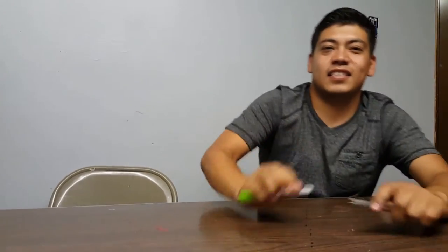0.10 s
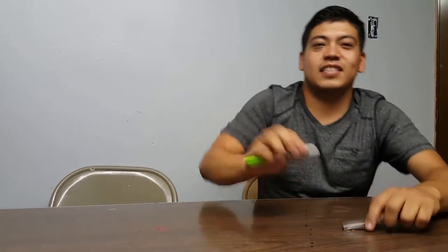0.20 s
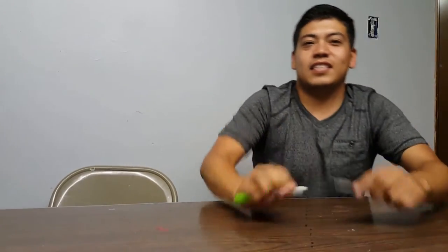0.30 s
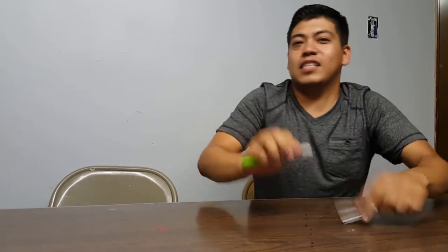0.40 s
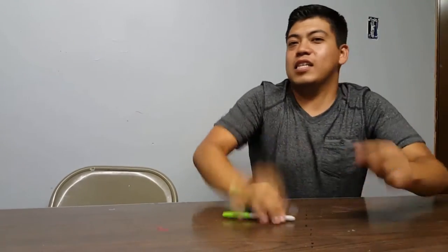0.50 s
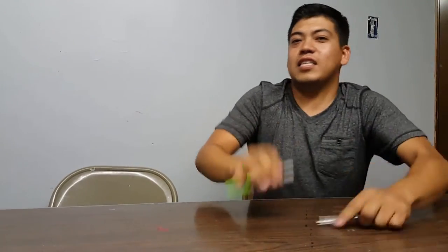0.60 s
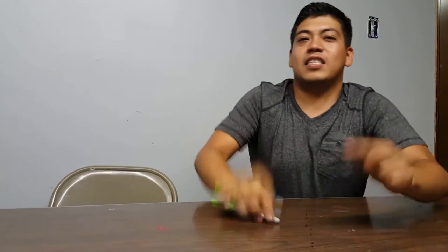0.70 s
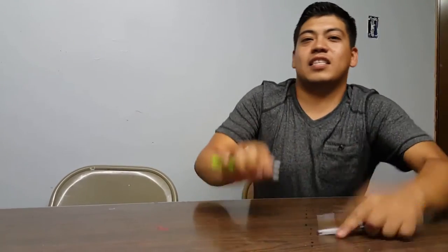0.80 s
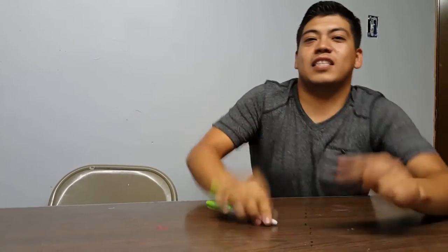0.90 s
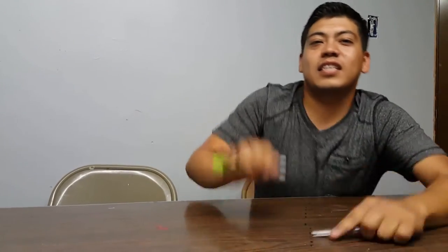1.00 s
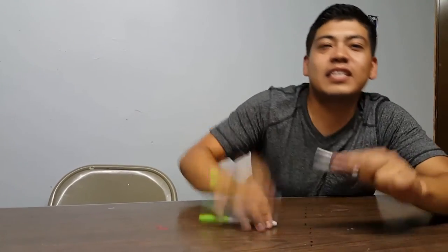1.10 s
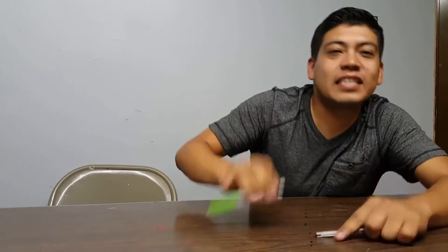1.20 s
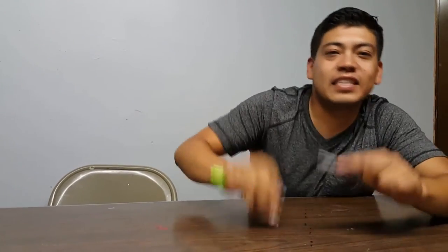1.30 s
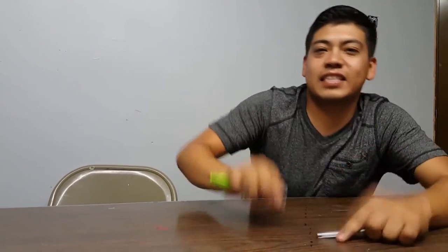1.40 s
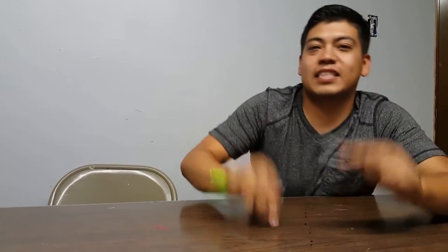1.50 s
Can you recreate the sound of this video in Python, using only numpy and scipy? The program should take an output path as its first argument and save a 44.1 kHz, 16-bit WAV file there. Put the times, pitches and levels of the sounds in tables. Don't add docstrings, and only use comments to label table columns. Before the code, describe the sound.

Plastic pens and hand heels drum a wooden table in quick uneven strokes, bright ticks over low thuds; a loud flat slap lands midway, then lighter taps follow. Small bare echoing room, close stereo microphone.

```python
import sys
import numpy as np
from scipy import signal
from scipy.io import wavfile

SR = 44100
rng = np.random.default_rng(int(sys.argv[2]) if len(sys.argv) > 2 else 0)


def gain_from_decibels(decibels):
    exponent = np.asarray(decibels, float) / 20
    return 10 ** exponent


def dump(signal):
    limited = np.clip(np.atleast_2d(signal).T, -1, 1)
    pcm = np.round(limited * 32767).astype(np.int16)
    wavfile.write(sys.argv[1], SR, pcm)


N = 68355


def read(points, hz):
    table_hz, value = np.transpose(points)
    return np.interp(np.log(hz + 1), np.log(table_hz + 1), value)


def add(mix, start_s, sound, pan_db):
    lag_s_per_db, widest_db = .000012, 5.0
    pan_db = np.clip(pan_db, -widest_db, widest_db)
    for channel, side in zip(mix, (.5, -.5)):
        start = max(round((start_s - side * pan_db * lag_s_per_db) * SR), 0)
        part = channel[start:][:len(sound)]
        part += sound[:len(part)] * gain_from_decibels(side * pan_db)


def ring(hz, db, t60, length_s):
    t = np.arange(0, length_s, 1 / SR)[:, None]
    fading = gain_from_decibels(db - 60 * t / np.maximum(t60, .002))
    return (fading * np.sin(2 * np.pi * hz * t)).sum(1)


# frequency in Hz, likeness from 0 to 1.
LIKENESS = [(100, .995), (250, .96), (500, .6), (1500, .25), (10000, .02)]


def stereo_noise(gain_db):
    frames, hz = N // 128 + 5, np.fft.rfftfreq(512, 1 / SR)[:, None]
    a, b, c, d = rng.standard_normal((frames, 257, 4)).T
    likeness = np.clip(read(LIKENESS, hz), 0, 1)
    shared = np.sqrt(1 + likeness) * (a + 1j * b)
    different = np.sqrt(1 - likeness) * (c + 1j * d)
    spectra = np.array([shared + different, shared - different])
    spectra = spectra * gain_from_decibels(gain_db(hz, np.arange(frames) * 128 / SR))
    return signal.istft(spectra, nperseg=512, noverlap=384)[1][:, :N]


# start in seconds, level in dB, left-right in dB,
# brightness in dB per octave.
TICKS = [(0.046, -20.5, 9, -2), (0.2423, -30.5, 1, -0.5), (0.3082, -56, -1.5, 0.4), (0.3898, -34.5, -3, -3),
         (0.4454, -34, -11, -5), (0.447, -35, -2.5, 6), (0.4997, -25.5, 11, 4.5), (0.6006, -22, 1.5, 3),
         (0.6837, -16.5, 12, -1), (0.6898, -14.5, -7, 0), (0.7653, -25, -8, 3), (0.8935, -33.5, 12, -3.5),
         (0.9871, -28, -12, 9.5), (1.0867, -37, 3, -0.8), (1.1701, -31, 2, 6), (1.293, -19, 2.5, 0),
         (1.3008, -20.5, 7.0, 4.5), (1.3752, -26, -11, 1.1), (1.4525, -48, 13, 1), (1.5129, -36.5, -2, -5)]
# frequency in Hz, level in dB, seconds to die by 60 dB.
TIP_TONES = [(2800, -8, .004), (3600, -1, .004), (4500, -6, .003), (6200, -4, .003), (8400, -1, .003),
             (10500, -7, .003), (12500, -4, .003), (14000, -5, .002)]


def ticks():
    level_trim_db, chatter_s, spread_db = 0.1, .001, 1.5
    lag_s, to_room_db = .0007, -8.0
    near, far = np.zeros((2, N)), np.zeros((2, N))
    hz, db, t60 = np.transpose(TIP_TONES)
    luck = rng.standard_normal((len(TICKS), 2, len(TIP_TONES)))
    grit = rng.standard_normal((len(TICKS), 200))
    for (start_s, level_db, pan_db, tilt_db), (detune, uneven), grains in zip(TICKS, luck, grit):
        chatter = grains ** 3 * np.exp(-np.arange(200) / (chatter_s * SR / 2))
        chatter[0] = -2 * abs(chatter).max()
        tilted_db = db + np.clip(tilt_db, -4, 4) * np.log2(hz / 6000)
        tones = ring(hz * (1 + detune / 30), tilted_db + spread_db * uneven, t60, .02)
        sound = np.convolve(chatter, tones)
        sound = gain_from_decibels(level_db + level_trim_db) * sound / abs(sound).max()
        click = ring(hz, tilted_db, t60 / 3, .01)
        click = gain_from_decibels(to_room_db) * click * np.linalg.norm(sound) / np.linalg.norm(click)
        add(near, start_s + lag_s, sound, pan_db)
        add(far, start_s + lag_s, click, 0)
    return near, far


BARREL_TO_ROOM_DB = -8.5
# start in seconds, level in dB, left-right in dB,
# pitch ratio set by the free length.
KNOCKS = [(0.049, -45, 7, 1.01), (0.245, -69, -5, 1.8), (0.448, -59, 7, 1.65), (0.69, -19.5, 9, 1.256),
          (.770, -29.5, 6, 0.923), (.896, -38, 4, 0.497), (0.9913, -36, 5, 0.998), (1.088, -37.5, 7, 0.43),
          (1.1742, -35.5, -3, .99), (1.300, -26, 8.5, 0.97), (1.380, -37.5, -13, 1),
          (1.514, -41.5, 56, 0.81)]
# frequency in Hz, level in dB, seconds to die by 60 dB.
BARREL_TONES = [(550, -21, 0.01), (765, -2, 0.028), (1028, 11.5, 0.0098), (1249, 12, 0.012),
                (1550, -6.5, 0.013), (1860, -29, 0.0035), (2586, 0, 0.015), (2940, -17, .01)]


def knocks():
    level_trim_db, rise_s = -2, .0012
    out = np.zeros((2, N))
    hz, db, t60 = np.transpose(BARREL_TONES)
    for start_s, level_db, pan_db, pitch_ratio in KNOCKS:
        sound = ring(hz * pitch_ratio, db, t60, .06)
        sound = sound * np.minimum(np.arange(len(sound)) / SR / rise_s, 1)
        add(out, start_s, gain_from_decibels(level_db + level_trim_db) * sound / abs(sound).max(), pan_db)
    return out, gain_from_decibels(BARREL_TO_ROOM_DB) * out


# start in seconds, level in dB, contact time in seconds,
# place along the top from 0 to 1.
THUDS = [(.008, -41, 0.0019, 0.59), (0.047, -25.5, .0015, 0.75), (0.244, -19, 0.00255, 0.24),
         (0.311, -29.5, 0.0015, 0.45), (.448, -18, 0.0026, .05), (0.5, -31.5, 0.0025, 0),
         (0.599, -39, 0.00067, 0), (0.689, -28.5, 0.0016, 0.9), (0.768, -67, 0.001, 0.66),
         (.895, -44.5, 0.0017, .3), (.992, -39.5, 0.0033, 0.7), (1.088, -42, 0.0019, 0.58),
         (1.173, -38, 0.0011, 0.75), (1.295, -48, 0.0033, 0.8), (1.301, -33.5, 0.0016, 0.73),
         (1.376, -27.5, 0.0037, 0.72), (1.512, -40.5, 0.00058, 0.88)]
# frequency in Hz, level in dB, seconds to die by 60 dB,
# half waves along the top.
TOP_TONES = [(55.6, -41, 0.042, 0.69), (81.5, -40, 0.16, .4), (122, -17, 0.27, 0.82), (143.56, 5, 0.47, .7),
             (178.06, -13.5, 0.48, 0.27), (200.4, 3.5, 0.37, 0.58), (226.6, -9, .3, 0.25),
             (244.1, -2, 0.26, 0.3), (274.7, -5.5, 0.225, 0.034), (329, -24, 0.59, 1),
             (339, -11.5, 0.5, 0.94), (407, -22, 0.6, 0.91), (466, -19.5, 0.2, 0.38), (542, -17, 0.6, 0.71)]


def thuds():
    swell_s, swell_start = .012, .5
    out = np.zeros((2, N))
    hz, db, t60, half_waves = np.transpose(TOP_TONES)
    for start_s, level_db, contact_s, place in THUDS:
        push = np.sin(np.pi * np.clip(np.arange(400) / SR / max(contact_s, 1e-4), 0, 1))
        movement = abs(np.cos(np.pi * half_waves * place)) + 0.059
        tones = ring(hz, db + 20 * np.log10(movement), t60, .7)
        tones = tones * (1 - (1 - swell_start) * np.exp(-np.arange(len(tones)) / SR / swell_s))
        add(out, start_s, -gain_from_decibels(level_db) * np.convolve(push / push.sum(), tones), 0.3)
    return out


# start in seconds, level in dB,
# width in seconds (below zero is a pull), left-right in dB.
SLAPS = [
    (0.6907, -8, .0012, 1.3),
    (0.6915, -14.5, -0.0056, 2.9),
    (1.3000, -26, -0.00035, 14),
]


def slaps():
    out = np.zeros((2, N))
    for start_s, level_db, width_s, pan_db in SLAPS:
        u = np.arange(1200) / SR / abs(width_s)
        puff = np.sign(width_s) * gain_from_decibels(level_db) * (1 - u) * np.exp(-u)
        add(out, start_s, puff * np.minimum(u * 10, 1), pan_db)
    return out


# frequency in Hz, level in dB.
FRAME_LEVEL = [(300, -11.5), (500, -23.5), (1000, -34.5), (2500, -45), (5000, -51), (9000, -52.5),
               (15000, -74)]
# frequency in Hz, seconds to die by 60 dB.
FRAME_T60 = [(400, .6), (1200, .95), (3000, .9), (6000, .7), (12000, .55)]


def frame_ring():
    level_trim_db, db_per_db, earlier_db = -13.0, 2.2, -25.5
    out, rise = np.zeros((2, 2 * N)), np.minimum(np.arange(N) / SR / 0.0039, 1)

    def fading_db(hz, t):
        return read(FRAME_LEVEL, hz) - 60 * t / read(FRAME_T60, hz)

    tails = [rise * stereo_noise(fading_db) for _ in range(3)]
    for k, (start_s, level_db, _, _) in enumerate(THUDS):
        gain = gain_from_decibels(level_trim_db + db_per_db * (level_db + 16))
        out[:, round(start_s * SR):][:, :N] += gain * tails[k % 3]
    earlier = np.pad(tails[2][:, 400:], [(0, 0), (0, 400)])
    return out[:, :N] + gain_from_decibels(level_trim_db + earlier_db) * earlier


# delay in seconds, level in dB.
EARLY = [(.003, -23.5), (.0055, -41), (.009, -3), (.012, -53), (.023, -10), (.03, -16.5)]
# frequency in Hz, seconds to die by 60 dB.
ROOM_T60 = [(100, 0.45), (260, 0.69), (700, 0.24), (1840, .25), (4850, 0.29), (12800, 0.13)]
# frequency in Hz, level in dB.
ROOM_LEVEL = [(100, -3.5), (400, 7), (1500, 6.5), (5000, 7), (14000, 10.5)]


def room(direct, send, wall_db):
    wall_s = .0172
    tail = stereo_noise(lambda hz, t: read(ROOM_LEVEL, hz) - 60 * t / read(ROOM_T60, hz))
    plain = stereo_noise(lambda hz, t: -60 * t / read(ROOM_T60, hz))
    tail = tail / np.linalg.norm(plain[0]) * np.minimum(np.arange(N) / SR / 0.0065, 1)
    for k, (delay_s, db) in enumerate(EARLY):
        tail[k % 2, round(delay_s * SR)] += gain_from_decibels(db) * (-1) ** (k // 2)
    tail[:, round(wall_s * SR)] += gain_from_decibels(wall_db)
    return direct + signal.fftconvolve(send.mean(0)[None], tail, axes=1)[:, :N]


# frequency in Hz, level in dB per Hz.
HUSH = [(18, -48), (30, -18), (252, 0), (584, -18), (937, -13), (1670, -25), (1960, -21), (3870, -35),
        (16000, -43)]


def hush():
    noise = stereo_noise(lambda hz, t: read(HUSH, hz) + 0 * t)
    return gain_from_decibels(-62.0) * noise / noise.std()


def scene():
    wall_db, wall_bass_db, top_to_room_db = -5.5, 6.0, -15.0
    top, (barrel, barrel_send), air = thuds(), knocks(), slaps()
    tips = room(*ticks(), wall_db)
    barrels = room(barrel + air, barrel_send + gain_from_decibels(BARREL_TO_ROOM_DB) * air, wall_db)
    table = room(top, gain_from_decibels(top_to_room_db) * top, wall_bass_db)
    return tips + barrels + table + frame_ring() + hush()


def roll_off(x):
    return signal.sosfilt(signal.butter(12, 16620, fs=SR, output="sos"), x)


def record(dry):
    low_cut_hz, edge_hz = 79, 15800
    bass_cut = signal.butter(2, low_cut_hz, "high", fs=SR, output="sos")
    treble_cut = signal.firwin(255, edge_hz, window=("kaiser", 9), fs=SR)
    mix = signal.sosfilt(bass_cut, dry)
    mix = signal.oaconvolve(mix, treble_cut[None], "same")
    return roll_off(mix)


dry = scene()
out = record(dry)
dump(out)
```